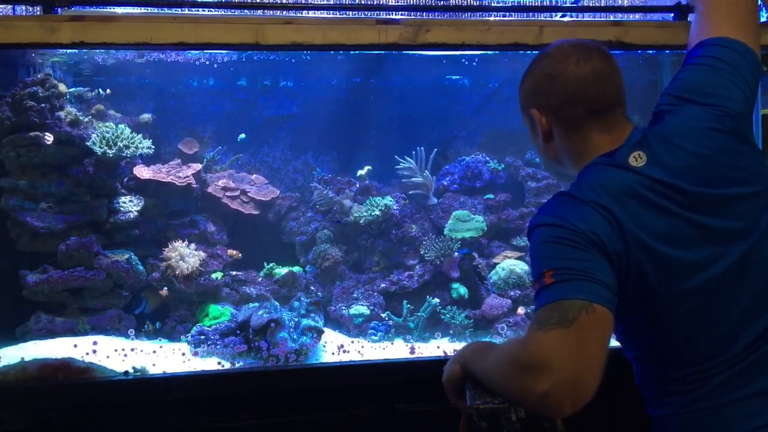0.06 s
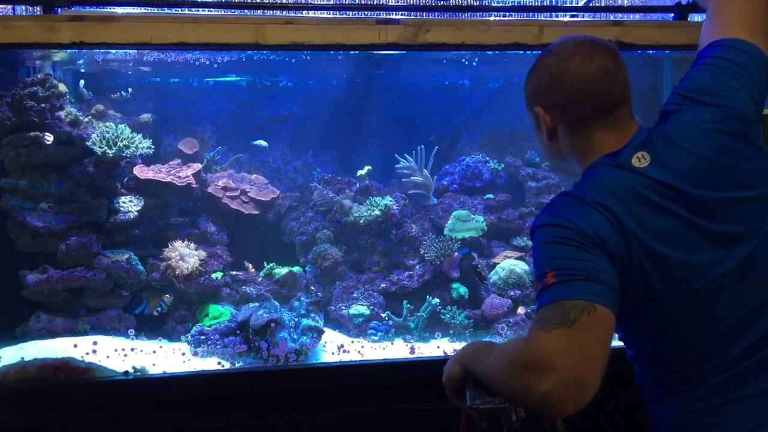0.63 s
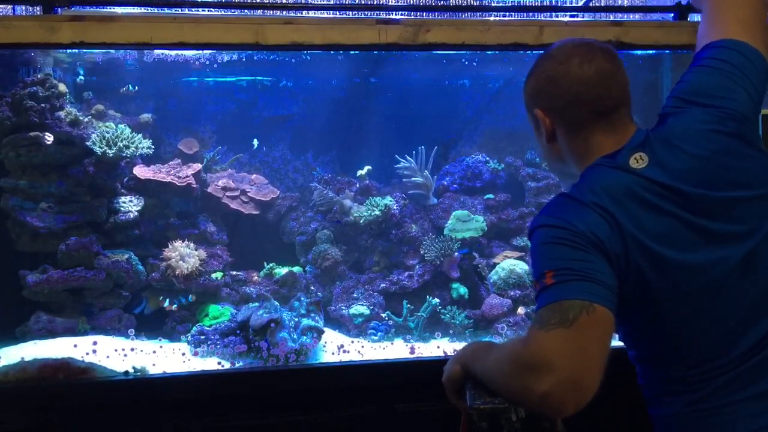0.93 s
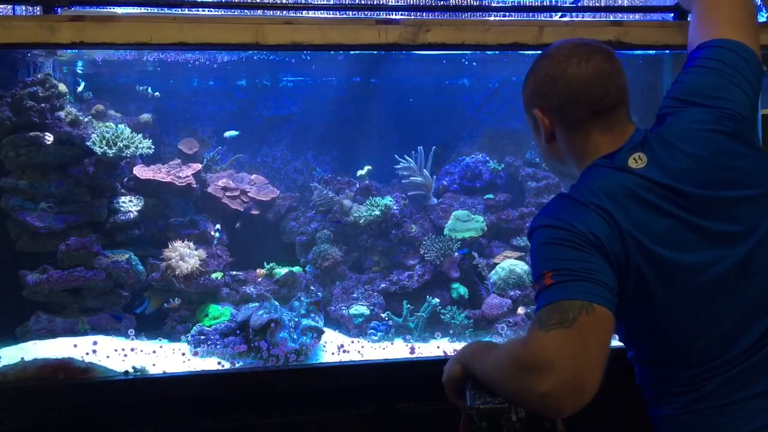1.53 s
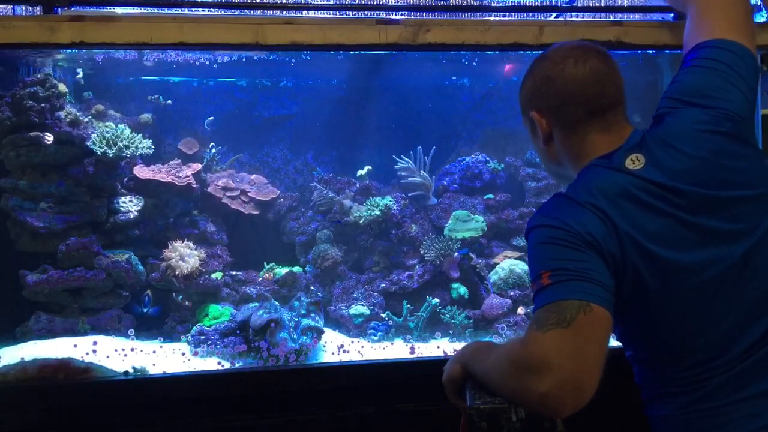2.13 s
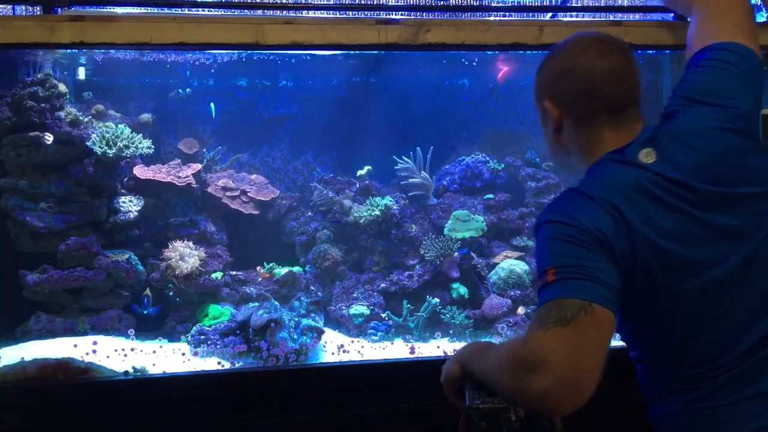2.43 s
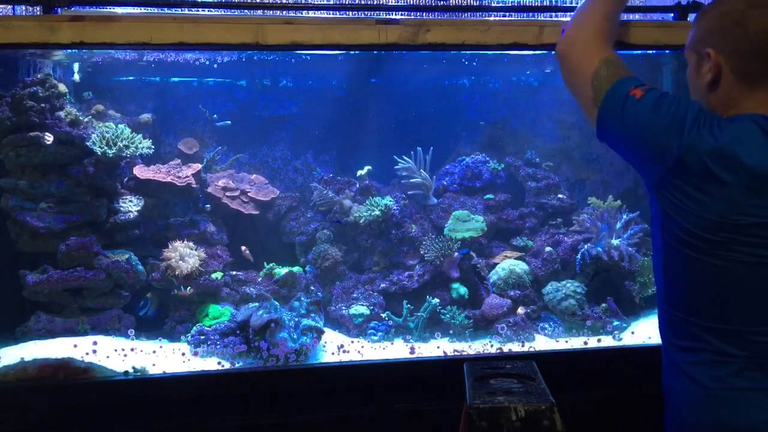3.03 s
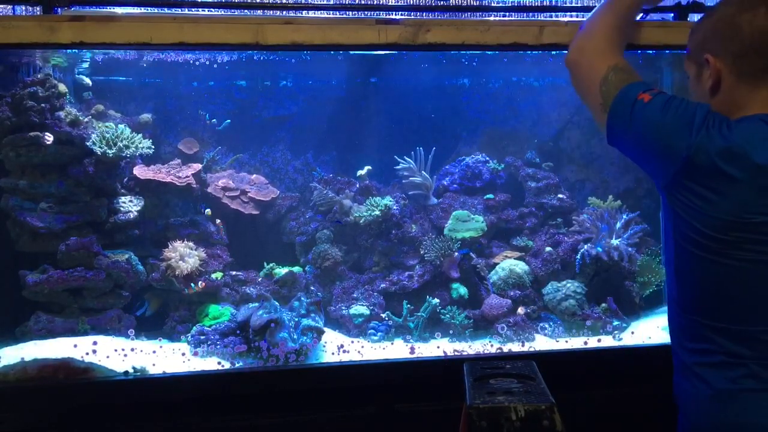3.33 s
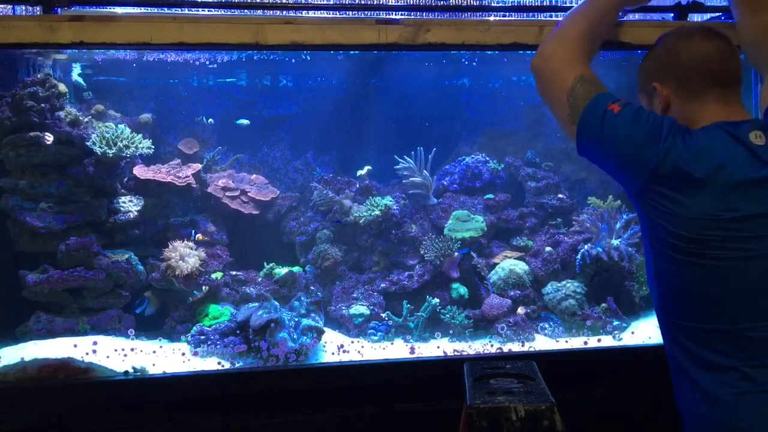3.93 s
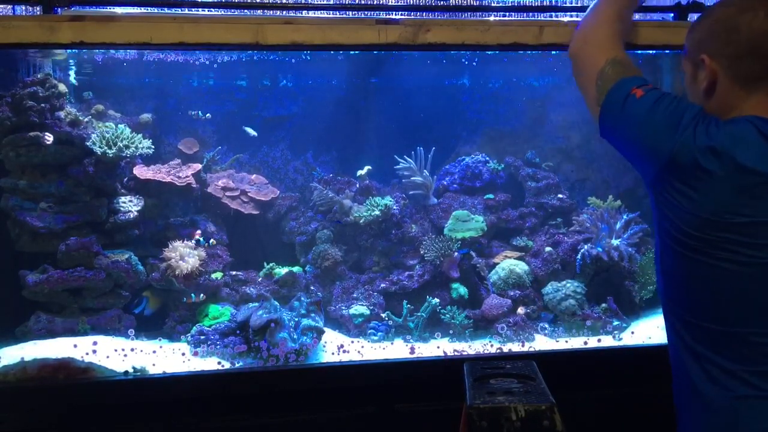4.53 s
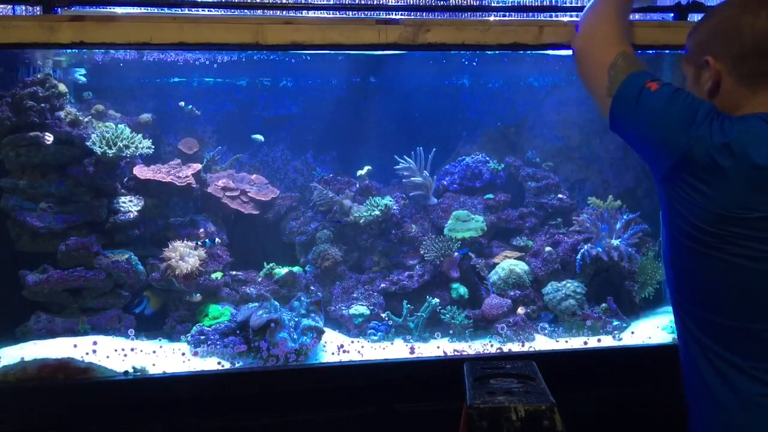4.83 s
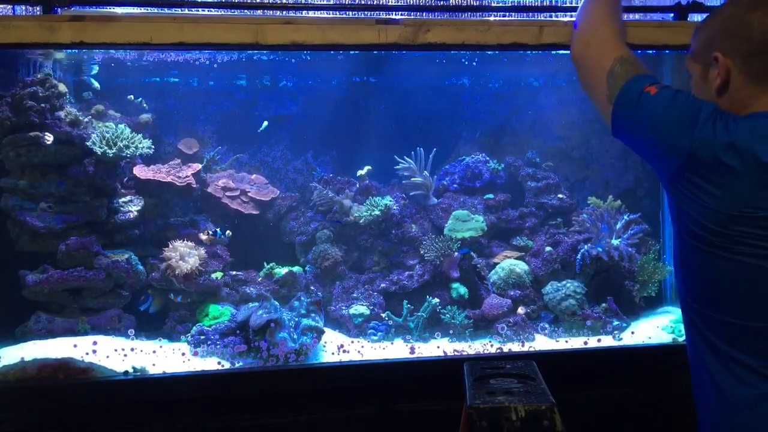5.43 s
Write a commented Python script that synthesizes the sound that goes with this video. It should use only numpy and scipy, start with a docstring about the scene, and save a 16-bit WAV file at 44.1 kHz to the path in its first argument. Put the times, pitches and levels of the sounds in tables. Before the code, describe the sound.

Light, crackly scraping on fish tank glass, a few knocks, then rapid scrubbing and churning water, while an overflow trickles and a pump hums.

```python
"""Scraping algae off aquarium glass

A man scrapes crusty algae off the inside of a big reef tank: first light, short scratches, then,
after he bumps the rim changing arms, hard scrubbing at almost seven strokes a second.
The crust snaps in tiny clicks that make the blade and the pane ring, and his arm churns up bubbles.
All the while the overflow trickles and the pump hums in the small room."""
import sys
import numpy as np
from scipy import signal
from scipy.fft import rfft, irfft, next_fast_len
from scipy.io import wavfile

SR = 44100
rng = np.random.default_rng(int(sys.argv[2]) if len(sys.argv) > 2 else 0)


def inscribe(sig):
    """Save sig as 16-bit PCM at rate SR to the path in sys.argv[1].

    A 1-D sig is mono; a 2-D sig holds one channel per row.
    Samples are clipped to [-1, 1] before scaling.
    """
    pcm = np.round(np.clip(np.atleast_2d(sig).T, -1, 1) * 32767)
    wavfile.write(sys.argv[1], SR, pcm.astype(np.int16))


N = 245637
TIME = np.arange(N) / SR
TOP_HZ = 15800


def from_db(db):
    return 10 ** (np.asarray(db) / 20)


def rms_one(x):
    """Scales a sound to an average (rms) level of 1."""
    return x / np.sqrt(np.mean(x ** 2) + 1e-20)


def cut(x, hz, keep, order=2):
    """Keeps the "low" or the "high" side of a sound."""
    return signal.sosfilt(signal.butter(order, hz, keep, fs=SR, output="sos"), x)


def add(out, start_s, sound):
    """Lays a sound into a track."""
    at = int(np.clip(start_s * SR, 0, len(out)))
    out[at:at + len(sound)] += sound[:len(out) - at]


def drift(per_s):
    """A smooth random wobble of about size 1, turning roughly per_s times a second."""
    knots = np.arange(0, N + 32, 32)
    hz = np.fft.rfftfreq(len(knots), knots[1] / SR)
    slow = irfft(rfft(rng.standard_normal(len(knots))) / (1 + (hz / per_s) ** 2), len(knots))
    return np.interp(np.arange(N), knots, rms_one(slow))


def clicks(per_s, spread_db):
    """Random clicks of uneven size and sign."""
    chance = rng.random(N) * SR / per_s
    born = chance < 1
    sizes = np.zeros(N)
    sizes[born] = from_db(spread_db * np.minimum(-np.log(chance[born]), 4))
    return sizes * rng.choice([-1, 1], N)


def coloured(x, spectrum):
    """Makes each pitch as strong or weak as a table says."""
    hz, db = np.transpose(spectrum)
    bins = np.maximum(np.fft.rfftfreq(N, 1 / SR), 1)
    gain = from_db(np.interp(np.log(bins), np.log(hz), db))
    return rms_one(irfft(rfft(x) * gain, N))


def patchy(x, spread_db, per_s, lowest_hz, bands):
    """Bands above lowest_hz swell and fade, each on its own."""
    size = next_fast_len(N)
    spectrum = rfft(x, size)
    edges_hz = np.geomspace(lowest_hz, TOP_HZ, bands, endpoint=False)
    band = np.searchsorted(edges_hz, np.fft.rfftfreq(size, 1 / SR))
    gains = [1] + [rms_one(from_db(spread_db * drift(per_s))) for _ in range(bands)]
    return rms_one(sum(gain * irfft(spectrum * (band == k), size)[:N] for k, gain in enumerate(gains)))


def ringing(x, tones, wander_db=0):
    """A sound plus the tones it wakes, whose strength may wander; narrow tones ring longer."""
    out = x.copy()
    for hz, width_hz, db in tones:
        strength = from_db(wander_db * drift(per_s=5)) if wander_db else 1
        decay = np.exp(-np.pi * width_hz / SR)
        gain = (1 - decay ** 2) / 2
        feedback = [1, -2 * decay * np.cos(2 * np.pi * hz / SR), decay ** 2]
        out += from_db(db) * signal.lfilter([gain, 0, -gain], feedback, x * strength + 1e-18)
    return out


def bubble(hz, cycles):
    """One bubble swells, rings for some cycles and fades."""
    age = np.arange(int(5 * cycles / hz * SR) + 2) / SR
    swell = 2 * age * hz / cycles
    return np.sin(2 * np.pi * hz * age) * swell * np.exp(1 - swell)


def bubble_clouds(rows, cycles, spread_octaves, count, glide_octaves=0):
    """Each row frees a cloud of bubbles; its pitch moves by glide_octaves from middle to end."""
    out = np.zeros(N)
    for middle_s, length_s, db, pitch_hz in rows:
        cloud = np.zeros(N)
        for early, late, size in rng.uniform(-1, 1, (count, 3)):
            when = (early + late) / 2  # most come near the middle
            hz = pitch_hz * 2 ** (glide_octaves * when + spread_octaves * size)
            start_s = middle_s + 0.77 * (when * length_s - cycles / hz)
            add(cloud, start_s, (1 - size ** 2 / 2) * bubble(hz, cycles))
        out += from_db(db) * rms_one(cloud) * np.sqrt(length_s * SR / N)
    return out


# The tone colour of falling water: pitch_hz, level_db
TRICKLE_COLOUR = [(300, -37), (400, -9), (560, -13.5), (1050, -13), (1400, -16), (1780, -12.5), (2050, 0),
                  (2450, -1.5), (3100, -11), (4200, -9), (6000, -17.5), (9000, -22), (15500, -27.5)]
# Air ringing in the overflow box: pitch_hz, width_hz, level_db
BOX_TONES = [(1202, 140, -0.5), (1253, 24, 11.5), (1456, 21, 12), (1987, 54, -3.5)]


def overflow(count=4500, low_hz=2400, high_hz=15000, level_db=-49.5):
    """Water falls down the overflow as a wash of spray with tiny bubbles tinkling in it."""
    tinkle = np.zeros(N)
    for when, place, size in rng.random((count, 3)):
        hz = low_hz * (high_hz / low_hz) ** place
        strength = hz * from_db(3.4 * min(-np.log(size), 3))
        add(tinkle, when * N / SR, strength * bubble(hz, cycles=16.3))
    spray = clicks(per_s=9000, spread_db=-1)
    water = coloured(rms_one(spray) + from_db(-6) * rms_one(tinkle), TRICKLE_COLOUR)
    water = patchy(ringing(water, BOX_TONES), spread_db=1.4, per_s=17, lowest_hz=1900, bands=12)
    return from_db(level_db + 0.6 * drift(per_s=12)) * water


def dribble(count=110, low_hz=1950, high_hz=3300, level_db=-50):
    """Small drops plink into the overflow box at random."""
    out = np.zeros(N)
    for when, place in rng.random((count, 2)):
        hz = low_hz * (high_hz / low_hz) ** place
        add(out, when * N / SR, from_db(level_db) * bubble(hz, cycles=24))
    return out


# The tone colour of the rumbling pump and pipes: pitch_hz, level_db
RUMBLE_COLOUR = [(25, -43), (55, -33), (95, -15), (145, -7.5), (175, -6), (215, -0.5), (255, -2), (310, -8),
                 (390, -6.5), (520, -22.5), (1200, -44)]
# Air ringing in the drain pipes: pitch_hz, width_hz, level_db
PIPE_TONES = [(235, 28, 0.5), (401, 31, 5), (565, 8.2, 15)]


def pump(hum_hz=193.3, hum_db=-61, gurgle_db=-60):
    """The pump's spinning vanes hum while water gurgles in the pipes."""
    hz = hum_hz + 0.22 * drift(per_s=3.5)
    hum = rms_one(np.sin(2 * np.pi * np.cumsum(hz) / SR))
    hum *= from_db(hum_db - 2 * drift(per_s=2.3))
    rumble = coloured(clicks(per_s=500, spread_db=1.9), RUMBLE_COLOUR)
    gurgle = rms_one(ringing(rumble, PIPE_TONES))
    return hum + from_db(gurgle_db + 2.35 * drift(per_s=6.5)) * gurgle


# Pushes of the blade along the glass: start_s, rise_s, length_s, level_db
PUSHES = [(0.019, 0.019, 0.025, -40.5), (.233, 0.007, 0.014, -47), (.412, 0.007, 0.021, -46.5),
          (.484, 0.0088, 0.011, -45.5), (0.504, 0.011, 0.016, -43), (.528, 0.015, 0.024, -34),
          (.607, 0.0096, 0.073, -48), (0.691, 0.0084, 0.016, -38), (0.728, 0.0067, 0.014, -36.5),
          (.742, .005, 0.0058, -32), (.8, 0.036, 0.069, -46.5), (0.9492, 0.0047, 0.0058, -34.5),
          (1.037, 0.0045, 0.12, -49), (1.169, 0.011, 0.021, -40), (1.618, 0.0059, 0.014, -39),
          (2.058, .012, 0.03, -49.5), (4.524, 0.014, 0.047, -30.5), (4.664, 0.0093, 0.04, -28),
          (4.699, 0.017, 0.044, -28), (4.828, 0.012, 0.053, -27.5), (4.974, 0.033, 0.063, -27),
          (5.124, 0.035, 0.061, -28.5), (5.273, 0.018, 0.055, -23.5), (5.423, 0.023, 0.046, -23)]


def blade_moves(hard_db=-29.5, firmer_db_per_s=27, slides=11, rise_s=0.033):
    """The pushes, an ever firmer drag back after each hard one, and loose slides early on."""
    moves = list(PUSHES)
    hard_starts = [start_s for start_s, _, _, db in PUSHES if db > hard_db]
    for start_s in hard_starts:
        drag_db = -55.5 + firmer_db_per_s * (start_s - hard_starts[0])
        moves.append((start_s + 0.096, rise_s, 0.041, drag_db))
    for k, (when, size) in enumerate(rng.random((slides, 2))):
        slide_start_s = 0.07 + 2.33 * (k + when) / slides
        moves.append((slide_start_s, rise_s, 0.12, -61.5 + 4 * size))
    return moves


def pressure(moves, light_boost, sag_db, release_s, light_db=-35):
    """The blade bites, eases and lets go. A move gains light_boost dB per dB it is below light_db."""
    out = np.zeros(N)
    for start_s, rise_s, length_s, db in moves:
        boost_db = light_boost * max(light_db - db, 0)
        span = slice(int(start_s * SR), int(start_s * SR) + SR // 2)
        age = np.maximum(TIME[span] - start_s, 0)
        bite = np.minimum(age / rise_s, 1) ** 0.55
        crack = from_db(2) * np.exp(-(rise_s / 0.0049) ** 2 - age / 0.0068)  # a fast bite chips crust
        travel = np.clip((age - rise_s) / max(length_s - rise_s, 1e-3), 0, 1)
        let_go = np.exp(-np.maximum(age - length_s, 0) / release_s)
        out[span] += bite * (1 + crack) * let_go * from_db(db + boost_db - sag_db * travel ** 2)
    return out


def edge_echoes(x, echo_db=-7, fade_s=0.025):
    """Waves bounce back from the pane's edges, differently for each push, as each is at a new spot."""
    out, age = np.zeros(N), np.arange(SR // 20) / SR
    starts = [0] + sorted(int(push[0] * SR) for push in PUSHES[1:]) + [N]
    for first, last in zip(starts, starts[1:]):
        echoes = rng.standard_normal(len(age)) * from_db(-60 * age / fade_s)
        path = (age == 0) + from_db(echo_db) * echoes / np.linalg.norm(echoes)
        add(out, first / SR, signal.fftconvolve(x[first:last], path / np.linalg.norm(path)))
    return out


# The tone colour of breaking crust: pitch_hz, level_db
CRUST_COLOUR = [(50, -49), (100, -24.5), (160, -20), (220, -5), (450, -7), (1000, -2), (1400, -4.5),
                (2400, -3), (3500, -3), (4800, -5), (7200, -4.5), (9800, -11), (11800, -7.5), (15500, -16)]


def crust():
    """The algae crust snaps in thousands of tiny grains under the juddering blade."""
    snaps = coloured(clicks(per_s=4500, spread_db=0.9), CRUST_COLOUR)
    judder = from_db(0.56 * drift(per_s=45))
    return patchy(snaps * judder, spread_db=1.7, per_s=8, lowest_hz=1100, bands=22)


# The ringing of the blade: pitch_hz, width_hz, level_db
BLADE_TONES = [(1296, 60, 5.5), (1583, 73, 7.5), (2380, 52, 6.5), (2930, 47, 12), (3540, 200, 3.5),
               (4110, 92, 1), (5390, 160, -1), (6280, 50, -3), (7130, 260, 2.5), (7900, 160, 2),
               (10460, 84, -6), (11420, 60, 4.5), (13050, 180, -4)]


def singing_blade(scratch):
    """Held lightly, the blade crackles and sings."""
    crackle = from_db(-0.5 + 1.5 * drift(per_s=170))
    return ringing(scratch * crackle, BLADE_TONES, wander_db=2.8)


# The ringing of the glass pane: pitch_hz, width_hz, level_db
PANE_TONES = [(395, 30, 6), (475, 7.3, 0), (564, 24, -15), (665, 16, 0), (793, 16, 4), (950, 16, -21),
              (1235, 25, -1), (1506, 27, 1.5), (1568, 12, 2), (1655, 24, -1.5), (2102, 41, 2.5),
              (2300, 32, 4), (2354, 30, 2), (2480, 50, -9), (2680, 52, 5.5), (3060, 27, 1), (3340, 28, -2),
              (3460, 35, 4), (3790, 110, -4.5), (4070, 61, 3.5), (4550, 85, -3), (5120, 150, -10),
              (6430, 59, -13), (6750, 48, 9), (7060, 130, -9), (7650, 70, -3), (8800, 140, 3),
              (11200, 120, 5), (13800, 150, -2)]


def scraper(split_hz=4500, hollow_hz=1050, firm_from_s=4.4, flex_db=-31, gain_db=-2):
    """Breaking crust shakes the blade and the pane; each place on the glass rings differently."""
    grains, moves = crust(), blade_moves()
    # Light moves sound brighter, and the finest grains fade first along a stroke.
    force = pressure(moves, light_boost=-0.0836, sag_db=1.5, release_s=0.013)
    fine_force = pressure(moves, light_boost=0.1216, sag_db=6.5, release_s=0.018)
    coarse = cut(grains, split_hz, "low", order=3) * force
    fine = cut(grains, split_hz, "high", order=3) * fine_force
    scratch = edge_echoes(cut(coarse + fine, hollow_hz, "high", order=3))
    firm = TIME > firm_from_s  # the blade is now held flat and firm
    blade = singing_blade(scratch * ~firm)
    flex = force / (force + from_db(flex_db))  # only a hard push bends it enough to sound hollow
    hollow = cut(coarse, hollow_hz, "low", order=3) * (0.037 + 1.28 * flex) * from_db(-3 * ~firm)
    pane = ringing(scratch * firm + hollow, PANE_TONES, wander_db=2.8)
    return from_db(gain_db) * (pane + blade)


# Spurts of foam: middle_s, length_s, level_db, pitch_hz
FIZZES = [(.15, 0.029, -56, 11800), (1.32, 0.03, -54, 12800), (1.543, 0.019, -52.5, 12400),
          (1.717, 0.034, -53, 9200), (1.856, 0.025, -51, 5560), (2.151, 0.017, -54, 7000),
          (2.334, .025, -55.5, 6060), (2.785, 0.035, -51, 4820), (2.815, 0.064, -56, 8300),
          (3.084, 0.028, -53, 3600), (3.114, 0.014, -56, 9100), (3.309, 0.029, -58, 6700),
          (3.529, 0.043, -55.5, 5450), (3.698, .025, -55, 8600), (3.99, 0.064, -61, 10500),
          (4.132, 0.012, -55, 11600), (4.22, 0.02, -53, 6100), (4.36, 0.067, -59, 9600)]


def fizz(gain_db=-2):
    """Tiny bubbles burst at the surface in short spurts."""
    return from_db(gain_db) * bubble_clouds(FIZZES, cycles=13, spread_octaves=0.28, count=100)


# The arm shoving the water: middle_s, length_s, level_db, pitch_hz
SLOSHES = [(.265, 0.041, -56, 241), (.56, 0.027, -52, 270), (.69, 0.041, -51, 250), (.755, 0.037, -59, 315),
           (.945, 0.056, -56.5, 224), (1.2, 0.033, -54, 270), (2.739, 0.031, -57, 560),
           (2.835, 0.039, -55.5, 239), (3.41, 0.074, -57, 627), (3.465, 0.025, -44.5, 460),
           (3.485, 0.0516, -49, 278), (3.68, .12, -55, 232), (4.227, 0.015, -46.5, 670),
           (4.33, 0.076, -54, 259), (4.698, 0.022, -42, 340), (4.735, 0.058, -41, 855),
           (4.878, .045, -37.5, 552), (5.008, 0.045, -35, 700), (5.035, 0.035, -50.5, 245),
           (5.1, 0.077, -45.5, 326), (5.175, 0.057, -36.5, 583), (5.31, 0.058, -35.5, 630),
           (5.36, 0.047, -42, 286), (5.47, 0.066, -39, 465), (5.54, 0.072, -47, 330)]


def sloshes(gain_db=0.5):
    """Each shove churns up big bubbles; the lowest tend to come last."""
    churn = bubble_clouds(SLOSHES, cycles=2.894, spread_octaves=0.45, count=70, glide_octaves=-0.2)
    return from_db(gain_db) * churn


# Drops plinking into water, those at 1.855, 2.07 and 2.347 s in the overflow's trickle: start_s, level_db,
# pitch_hz
DRIPS = [(1.114, -47, 2990), (1.237, -41, 2980), (1.247, -39, 2540), (1.855, -42, 2216), (2.07, -45, 3430),
         (2.347, -42, 2400), (2.835, -43.5, 2990), (3.137, -46, 4400), (3.948, -44, 3010)]


def drips():
    """Each drop plinks as one small ringing bubble."""
    out = np.zeros(N)
    for start_s, db, hz in DRIPS:
        add(out, start_s, from_db(db) * bubble(hz, cycles=18))
    return out


# Short knocks: bumps on the tank's rim and hood, then a bright tap of the blade on the glass:
# start_s, level_db, low_hz, high_hz, fade_s (to fall 60 dB)
KNOCKS = [(2.553, -40, 705, 2620, 0.12), (2.572, -38.5, 118, 268, 0.13), (2.574, -40.5, 520, 1600, 0.089),
          (3.446, -41.5, 380, 1700, 0.26), (3.511, -41, 600, 2630, 0.12), (4.247, -40.5, 1500, 3860, 0.2)]


def knocks():
    """Each blow wakes many crowded tones in what it hits, and they die quickly."""
    out, age = np.zeros(N), np.arange(SR // 2) / SR
    for start_s, db, low_hz, high_hz, fade_s in KNOCKS:
        noise = rng.standard_normal(len(age))
        knock = rms_one(cut(cut(noise, high_hz, "low"), low_hz, "high"))
        add(out, start_s, knock * from_db(db - 60 * age / fade_s))
    return out


def gulp(start_s=3.5, level_db=-38, pitch_hz=285.5):
    """The arm plunges in and one big pocket of air closes behind it."""
    out = np.zeros(N)
    add(out, start_s, from_db(level_db) * bubble(pitch_hz, cycles=7.5))
    return out


# The blade squeaking: middle_s, half_length_s, level_db, pitch_hz
SQUEAKS = [(4.721, 0.0079, -34.5, 949), (4.727, .035, -40, 1674), (4.743, 0.019, -42, 817),
           (5.014, 0.02, -37, 796)]


def squeaks():
    """On clean glass the blade sticks and slips, making a short, unsteady tone."""
    out, waver = np.zeros(N), 1 + 0.012 * drift(per_s=60)
    for middle_s, half_length_s, db, hz in SQUEAKS:
        tone = rms_one(np.sin(2 * np.pi * np.cumsum(hz * waver) / SR))
        swell = np.exp(-((TIME - middle_s) / half_length_s) ** 2)
        out += from_db(db) * swell * tone
    return out


def room(x, echo_db=-11.5, split_hz=5000, low_fade_s=0.34, high_fade_s=0.13, first_echo_s=0.0015):
    """Many wall echoes follow the direct sound; their high part dies sooner."""
    age = np.arange(SR // 2) / SR
    echoes = rng.standard_normal(len(age)) * (age > first_echo_s)
    tail = cut(echoes, split_hz, "low", order=1) * from_db(-60 * age / low_fade_s)
    tail += cut(echoes, split_hz, "high", order=1) * from_db(-60 * age / high_fade_s)
    return x + from_db(echo_db) * signal.fftconvolve(x, tail / np.linalg.norm(tail))[:N]


def scene():
    """The tank's sounds echo in the room, and the pump is added underneath."""
    cleaning = scraper() + squeaks() + sloshes() + gulp() + fizz() + drips() + knocks()
    return (room(cleaning + overflow() + dribble()) + pump())[None]


def record(dry):
    """Everything above TOP_HZ is cut away steeply."""
    return signal.sosfilt(signal.ellip(12, .1, 80, TOP_HZ, fs=SR, output="sos"), dry)


dry = scene()
out = record(dry)
inscribe(out)
```